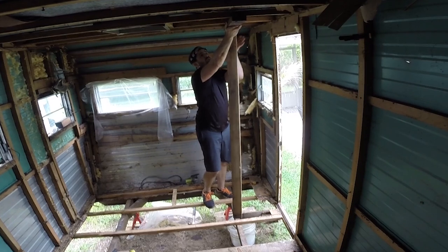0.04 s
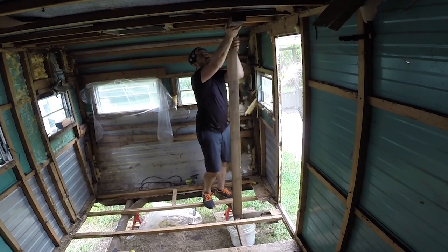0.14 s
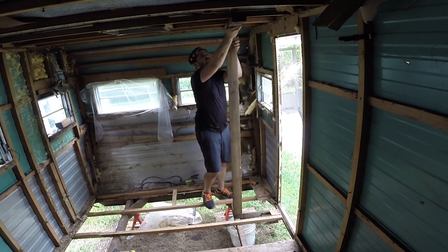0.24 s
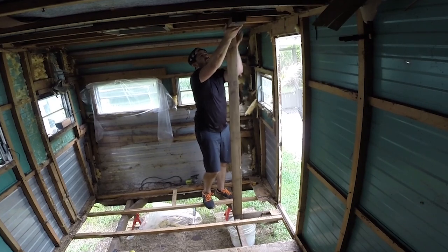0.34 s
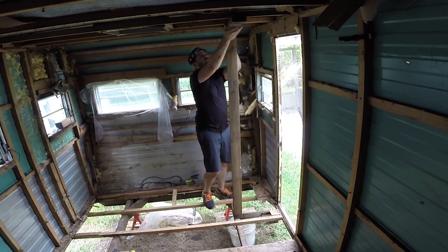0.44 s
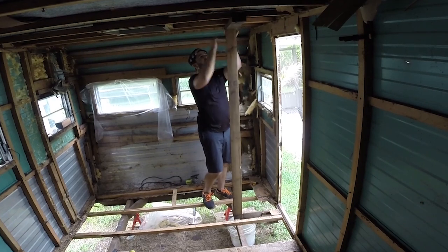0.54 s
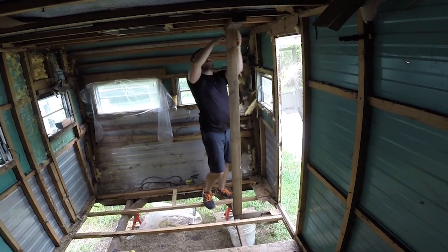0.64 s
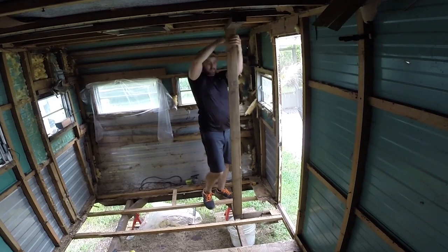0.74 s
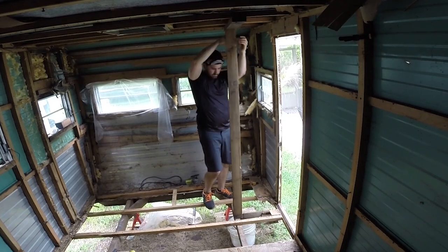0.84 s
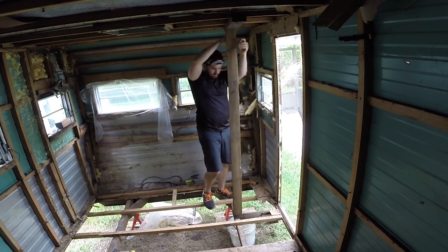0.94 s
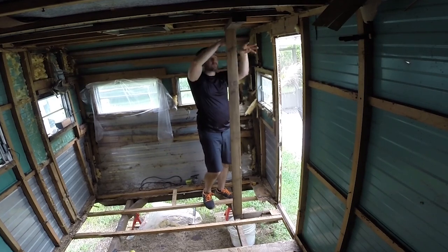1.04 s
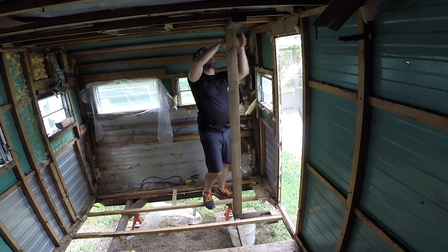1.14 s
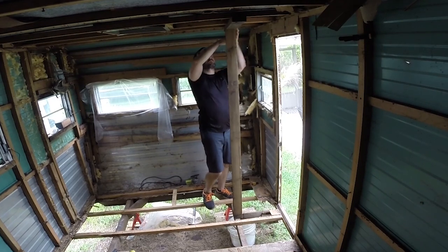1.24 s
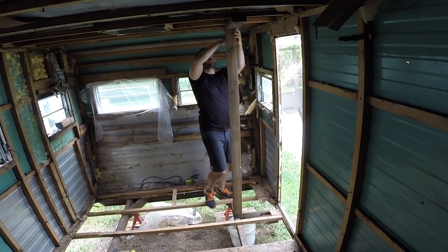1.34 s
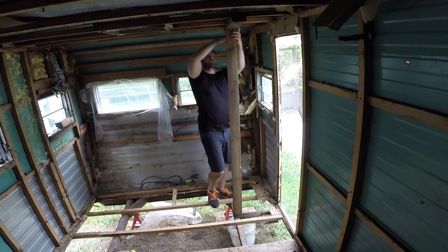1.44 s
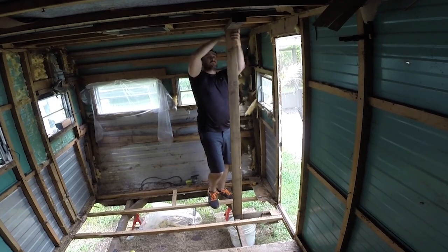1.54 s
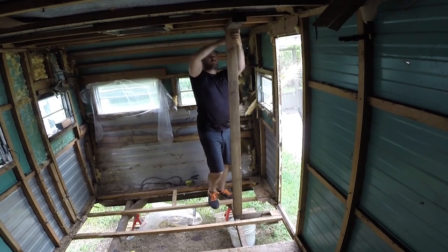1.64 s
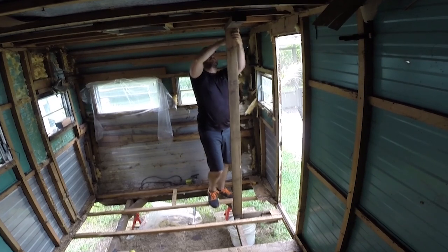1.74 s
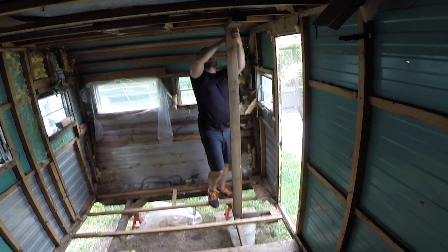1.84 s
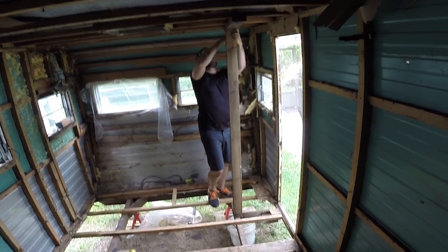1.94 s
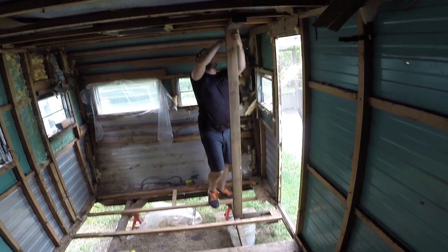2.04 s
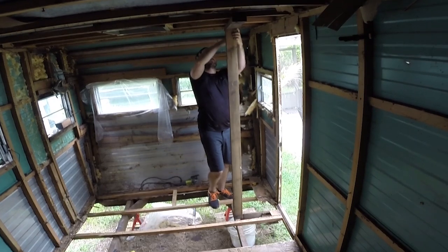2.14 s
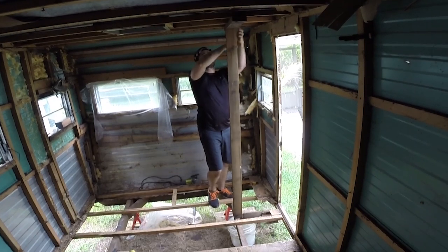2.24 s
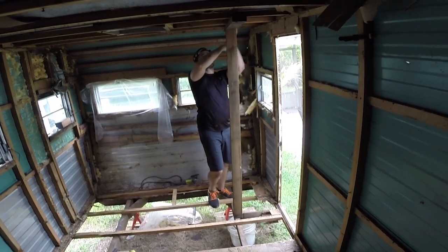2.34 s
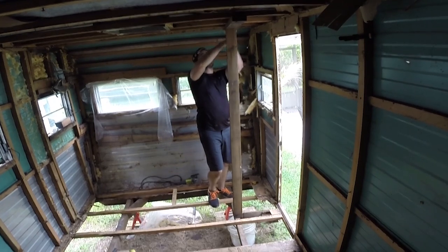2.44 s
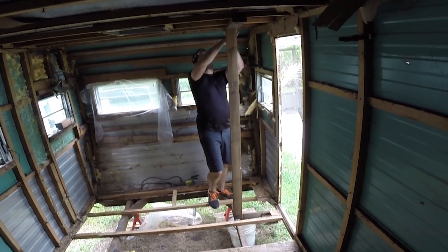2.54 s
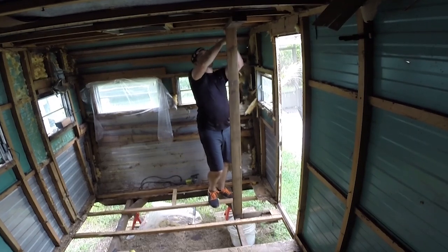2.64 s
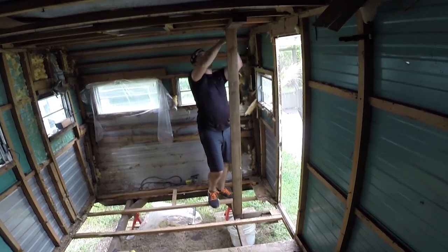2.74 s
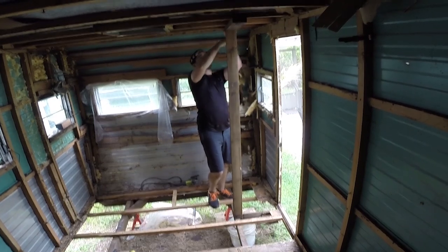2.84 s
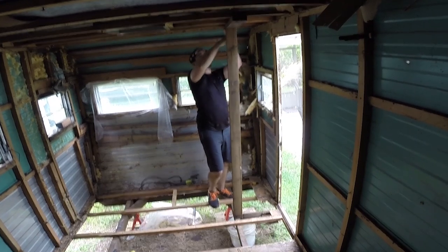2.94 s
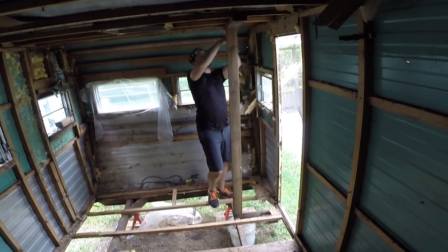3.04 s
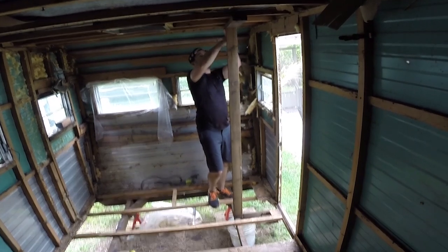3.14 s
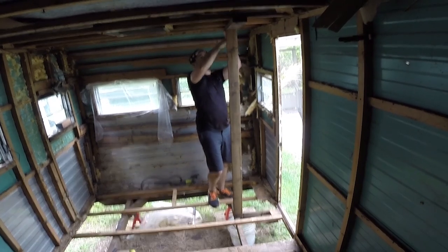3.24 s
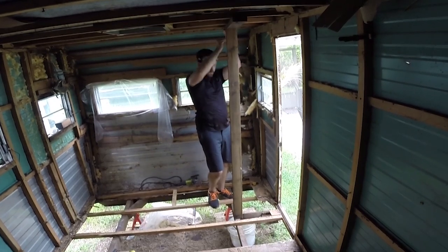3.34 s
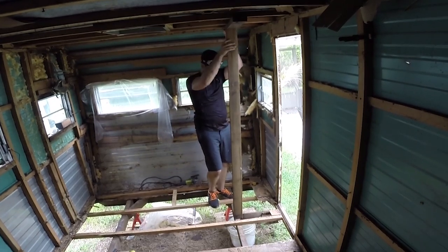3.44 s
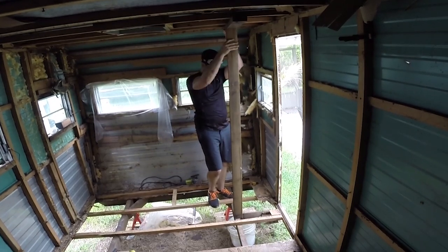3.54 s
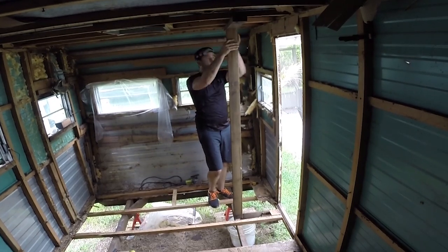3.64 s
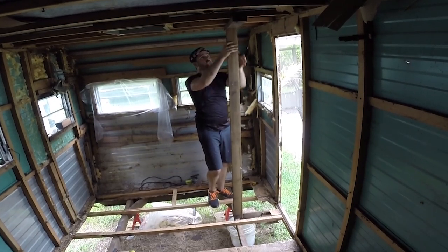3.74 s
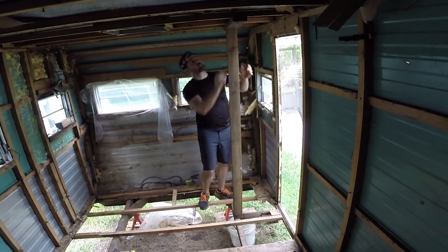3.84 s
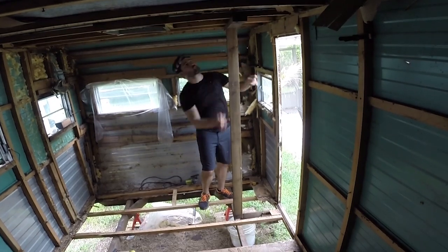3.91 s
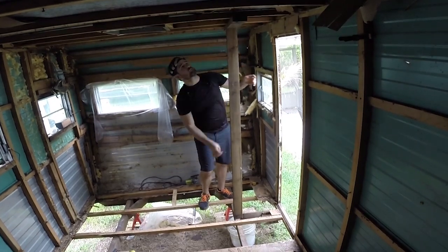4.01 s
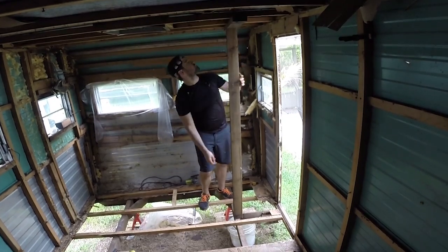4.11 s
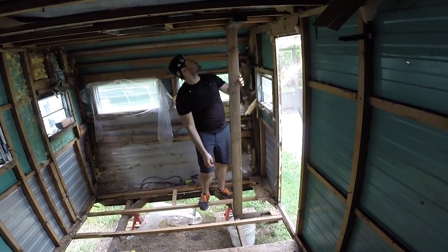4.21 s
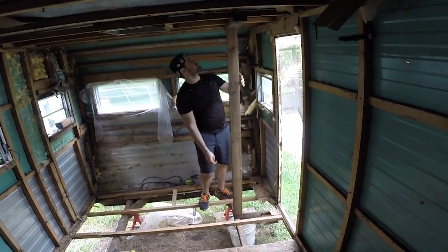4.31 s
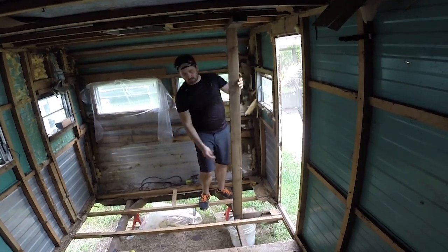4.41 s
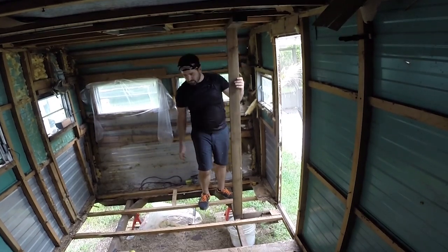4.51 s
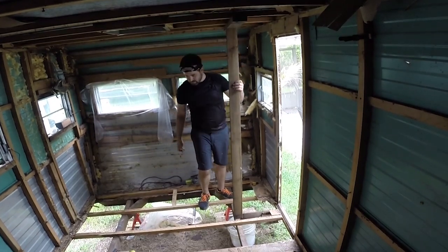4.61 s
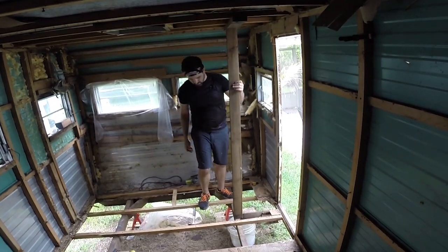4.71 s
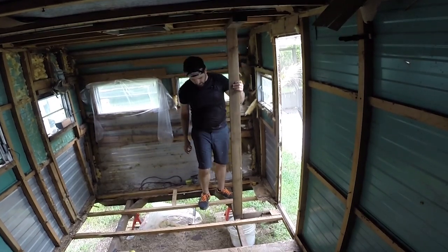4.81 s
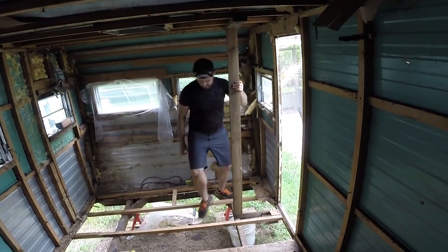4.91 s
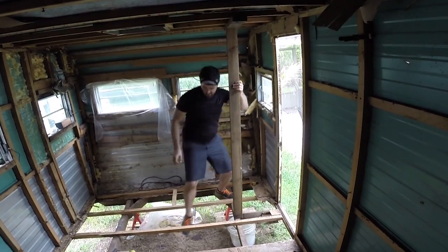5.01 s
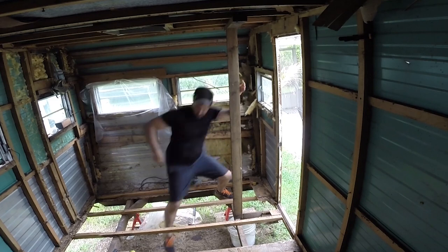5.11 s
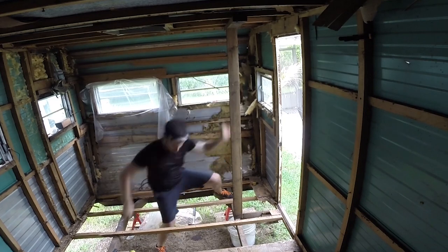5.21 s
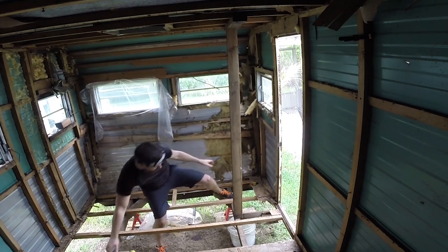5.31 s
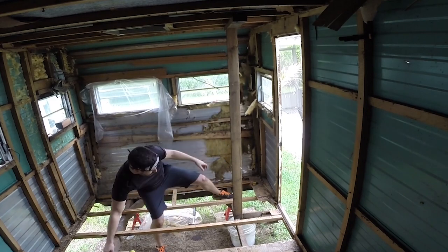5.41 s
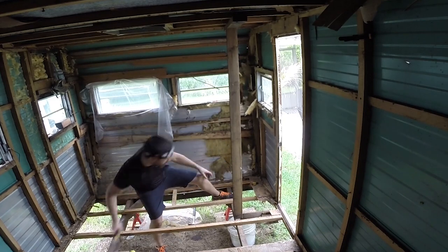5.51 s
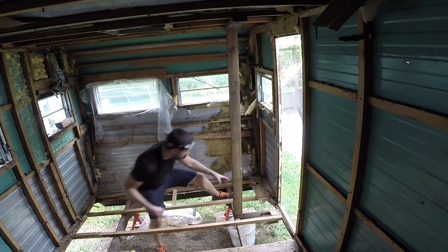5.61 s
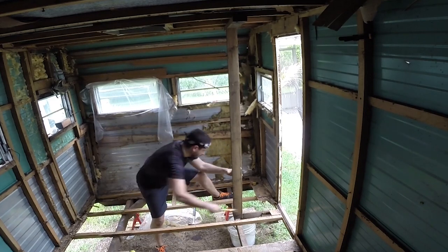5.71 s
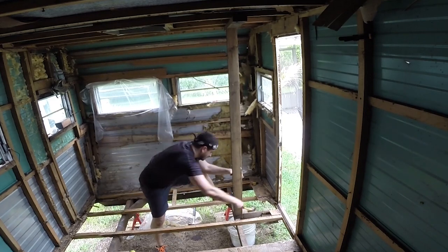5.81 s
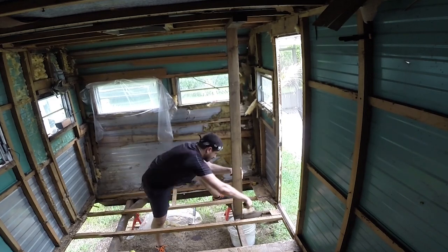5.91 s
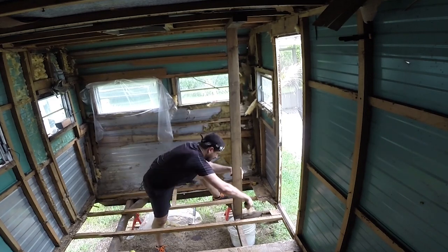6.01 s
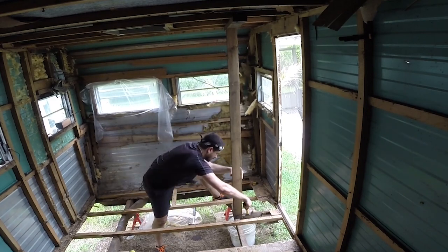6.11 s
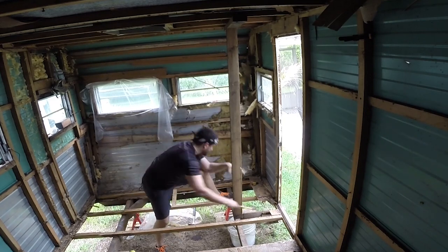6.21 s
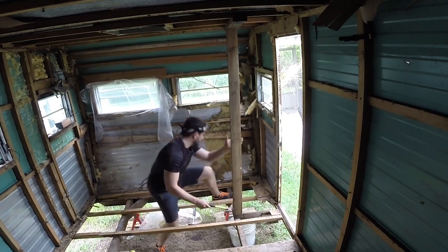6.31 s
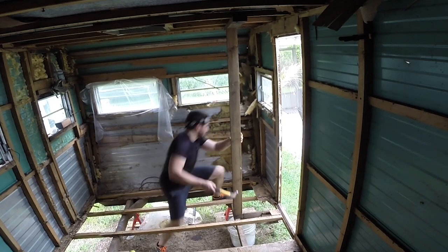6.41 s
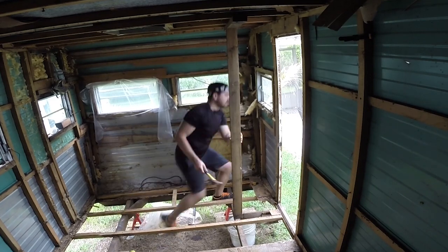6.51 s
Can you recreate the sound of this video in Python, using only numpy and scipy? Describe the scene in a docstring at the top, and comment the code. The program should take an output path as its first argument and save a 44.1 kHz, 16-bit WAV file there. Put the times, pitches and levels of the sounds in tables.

```python
"""Blows on a small metal cabin

Quick blows land on the timber frame: a lone clack among the first, a long run overhead, then three hard
knocks on a floor beam. Each is a noise crack with a rebound, ringing wood and a boom dying band by band.
The shell answers with a low rumble; shaped noise makes the scuffs of shoes and cloth, squeaks and bumps.
Two motors, built from sine waves, hum steadily over broad air noise."""
import sys
import numpy as np
from scipy import signal
from scipy.io import wavfile

SR = 44100
rng = np.random.default_rng(int(sys.argv[2]) if len(sys.argv) > 2 else 0)


def level_to_linear(level):
    """Convert decibel levels to linear amplitude factors, elementwise."""
    exponent = np.asarray(level, float) / 20
    return 10 ** exponent


def unload_wav(signal):
    """Save mono or channel-first audio to the path in sys.argv[1] as 16-bit WAV at rate SR, clipped to [-1, 1]."""
    wavfile.write(
        sys.argv[1],
        SR,
        np.round(np.clip(np.atleast_2d(signal).T, -1, 1) * 32767).astype(np.int16),
    )


N = 289296   # samples in the scene

# The levels in the next four tables are relative; struck() adds its own settings to them.
# blows overhead: t/s, crack strength/dB, boom strength/dB
ROOF_BLOWS = [(0.0014, -31.5, -23.5), (0.1796, -40, -29), (1.4895, -59, -36.5), (1.5757, -47.5, -33.5),
              (1.651, -32.5, -27), (1.72, -30, -23.5), (1.7865, -26, -29), (1.854, -19, -20),
              (1.9259, -22.5, -16), (1.9931, -21.5, -17), (2.0687, -18, -16), (2.1415, -21.5, -18),
              (2.2174, -20, -17.5), (2.2925, -24, -17), (2.3668, -24, -29.5), (2.4606, -20.5, -21),
              (2.5325, -19.5, -20), (2.613, -23.5, -21.5), (2.6892, -14.5, -15.5), (2.7654, -19, -16.5),
              (2.838, -18.5, -15), (2.9119, -20, -15.5), (2.9832, -17.5, -17.5), (3.055, -16, -18),
              (3.1336, -16, -15.5), (3.2223, -20, -17), (3.3027, -13.5, -16.5), (3.3799, -27.5, -17.5),
              (3.424, -31.5, -23.5)]
# knocks on the floor beam: t/s, crack strength/dB, boom strength/dB
FLOOR_KNOCKS = [(6.0365, 4, -19), (6.1267, 0.5, -18), (6.2117, 0.5, -17.5)]
# a lone clack of wood: t/s, crack strength/dB, boom strength/dB
LONE_CLACK = [(0.0837, -17, -26)]
# notes at which the struck wood rings: f/Hz, level/dB, time to fall 60 dB/s (0.45 s at most is used)
BEAM_NOTES = [(189, -19, .4), (242.6, -24, 0.35), (300, -31, 0.43), (374, -14, 0.51), (397, -20, 0.24),
              (619, -27, .12), (940, -28, 0.067), (1290, -19, 0.11), (1510, -24, 0.14), (1760, -20, 0.043),
              (1930, -14, 0.038), (2480, -26, 0.024), (3140, -21, 0.019), (3180, -21, 0.045),
              (3810, -19, .035), (4070, -10.5, 0.045), (5900, -28, 0.028), (7140, -19, 0.023),
              (8600, -26, 0.069)]


def rms_one(x):
    """Scales a sound to an average (rms) strength of 1."""
    return x / np.sqrt(np.mean(x ** 2) + 1e-20)


def at_hz(points, hz):
    """Reads a curve of (Hz, value) points at any pitch, on a logarithmic pitch scale."""
    points = np.array(points)
    return np.interp(np.log(hz), np.log(points[:, 0]), points[:, 1])


def band_pass(x, low_hz, high_hz):
    """Keeps the sound between two pitches."""
    return signal.sosfilt(signal.butter(2, [low_hz, high_hz], "band", fs=SR, output="sos"), x)


def drift(rate_hz):
    """Slow random wandering with spread 1: smoothed noise, made at every 40th sample and joined up."""
    r = np.exp(-2 * np.pi * rate_hz * 40 / SR)
    slow = signal.lfilter([1], [1, -2 * r, r * r], rng.standard_normal(N // 40 + 2002))
    slow = slow[2000:]   # skip the filter's start
    return np.interp(np.arange(N) / 40, np.arange(len(slow)), rms_one(slow))


def noise_bands():
    """Third-octave bands of white noise, neighbours unrelated: (centre Hz, sound)."""
    white = rng.standard_normal((2, N + SR))
    borders_hz = 25 * 2 ** np.arange(0, 9.4, 1 / 3)
    for k, (low, high) in enumerate(zip(borders_hz, borders_hz[1:])):
        yield np.sqrt(low * high), band_pass(white[k % 2], low, high)[SR:]


def swell(t, middle_s, length_s):
    """A smooth bump of height 1; length_s spans the part above 37 % of its height."""
    return np.exp(-((t - middle_s) / (length_s / 2)) ** 2)


def fade(x, t60):
    """A unit click becomes an envelope of height 1 that falls 60 dB in t60 seconds."""
    return signal.lfilter([1], [1, -level_to_linear(-60 / (t60 * SR))], x + 1e-18)


def ring(clicks, hz, t60):
    """A unit click sets off a sine of height about 1 that falls 60 dB in t60 seconds."""
    r, w = level_to_linear(-60 / (t60 * SR)), 2 * np.pi * hz / SR
    return signal.lfilter([0, np.sin(w)], [1, -2 * r * np.cos(w), r * r], clicks + 1e-18)


def motors():
    """Sines at multiples of each turning rate share one turning angle and waver slightly."""
    HUM_HZ, SECOND_HUM_HZ = 146.55, 108.6   # turning rates of the two motors
    # turning rate f/Hz, then a list of: multiple of that rate, rms level/dB before it wavers
    motor_tones = [(HUM_HZ, [(1, -50), (2, -55), (3, -57), (4, -63.5), (5, -65), (6, -54), (7, -68),
                   (9, -59), (13, -72.5), (15, -68.5), (18, -72), (21, -67.5), (23, -74), (24, -69),
                   (35, -73.5), (39, -77.5), (43, -79), (50, -76.5), (55, -77), (67, -80.5), (93, -84),
                   (107, -82)]), (SECOND_HUM_HZ, [(1, -56), (3, -58), (6, -61.5), (7, -73.5)])]
    out = np.zeros(N)
    for hz, multiples in motor_tones:
        turn = 2 * np.pi * hz * np.arange(N) / SR + 0.032 * drift(3.2)   # angle in radians
        for k, db in multiples:
            level = np.sqrt(2) * level_to_linear(db + 3.33 * drift(24))   # sqrt(2) turns rms into peak
            out += level * np.sin(k * turn + 0.31 * drift(2.9))
    return out


def air():
    """Broad steady noise: bands follow a fixed colour, each slightly patchy."""
    # colour of the air noise: f/Hz, relative level per Hz/dB
    air_colour = [(15, -48), (25, -13), (137, -2), (229, -10.5), (326, -11.5), (363, -10.5), (427, -4.5),
                  (476, -16.5), (641, -4.5), (796, -17), (863, -19), (936, -14), (1330, -19), (1480, -21),
                  (16000, -45)]
    total = np.zeros(N)
    for hz, band in noise_bands():
        total += level_to_linear(at_hz(air_colour, hz) + 0.6 * drift(1.6)) * band[:N]
    return level_to_linear(-43.5) * rms_one(total)


def struck(events, modes, tail, wood_db, modes_db, tail_db, crack_db, rebound_db, slap_db, ring_db,
           slower, sameness):
    """Blows on one body: crack and rebound, slaps off walls, ringing wood, an echo tail dying band by band."""
    # slaps returning from nearby walls: delay/s, f/Hz, relative level/dB
    wall_slaps = [(.0045, 793, 5), (.0095, 588, -1), (0.02, 450, 0)]
    # how fast the tail dies: f/Hz, time to fall 60 dB/s (before "slower" stretches it)
    dying_times = [(100, 0.74), (250, 0.48), (500, 0.45), (1100, 0.18), (2900, 0.1), (7700, 0.081),
                   (15000, 0.12)]
    s, crack_peak_db, boom_db = np.transpose(events)
    # the wood's strength lies between crack and boom
    wood_peak_db = wood_db + 0.59 * crack_peak_db + 0.41 * boom_db
    rows = np.transpose([boom_db, wood_peak_db, crack_peak_db])   # strength low, middle, high
    loudest = rows.max(axis=0)
    log_hz = np.log([350, 1400, 5000])   # where those three strengths hold
    at = (s * SR).round().astype(int)
    chance = rng.random((len(at), 3))
    rebound = ((0.006 + 0.016 * chance[:, 0]) * SR).astype(int)   # 6 to 22 ms later
    rebound_gain = level_to_linear(rebound_db - 7.5 * chance[:, 1])
    fresh_start = (chance[:, 2] * (N - SR)).astype(int)

    def strength(hz, spread_db):
        """Strength of every blow at one pitch, with some chance."""
        db = [np.interp(np.log(hz), log_hz, row) for row in rows]
        return level_to_linear(db + spread_db * rng.standard_normal(len(at)))

    def clicks(hz, spread_db, late_s=0):
        """One click per blow and a weaker one for its rebound."""
        train, start = np.zeros(N), at + int(late_s * SR)
        train[start] = strength(hz, spread_db)
        train[start + rebound] = train[start] * rebound_gain
        return train

    out, t = np.zeros(N + SR), np.arange(SR // 2) / SR
    size = len(t)
    for hz, band in noise_bands():
        t60 = slower * at_hz(dying_times, hz)
        power = 10 ** (-60 * t / t60 / 10)
        # a faint slower ring of the sheet metal follows
        power += 10 ** ((ring_db - 22.5 * t / t60) / 10)
        # echoes take a moment to gather, lows longer
        gather_s = min(t60 / 4, 0.001 + 34.0 / hz)
        power -= 0.74 * 10 ** (-30 * t / gather_s / 10)
        # the tail's colour holds for the loudest strengths
        shape = at_hz(tail, hz) - np.interp(np.log(hz), log_hz, loudest)
        envelope = level_to_linear(shape + tail_db) * np.sqrt(np.maximum(power, 0))
        gains = strength(hz, spread_db=2.0)
        for i, gain, fresh, lag, lag_gain in zip(at, gains, fresh_start, rebound, rebound_gain):
            # blows on the same spot partly repeat the same pattern of echoes
            echoes = sameness * band[:size] + np.sqrt(1 - sameness ** 2) * band[fresh:fresh + size]
            one = gain * envelope * echoes
            out[i:i + size] += one
            out[i + lag:i + lag + size] += lag_gain * one
    out = out[:N]
    for hz, db, t60 in modes:
        hits = clicks(hz, spread_db=4.0, late_s=2.572 / hz)   # low notes start later
        out += level_to_linear(db + modes_db) * ring(hits, hz, min(t60, 0.45))
    for late_s, hz, db in wall_slaps:
        hits = clicks(hz, spread_db=0.5 + sameness, late_s=late_s)
        out += level_to_linear(db + slap_db) * ring(hits, hz, 4.8 / hz)
    # the hard tick of first contact
    out += level_to_linear(crack_db + 7.0) * ring(clicks(5000, spread_db=1.5), 3730, 0.002)
    crack = fade(clicks(4200, spread_db=4.0), 0.014) * rng.standard_normal(N)
    return out + level_to_linear(crack_db) * band_pass(crack, 1800, 11000)


def roof_blows():
    """Blows overhead: long low ringing, and echoes that are partly alike from blow to blow."""
    # notes that ring overhead: f/Hz, relative level/dB, time to fall 60 dB/s (0.45 s at most is used)
    roof_notes = [(198.3, -4, 0.61), (219.2, -0.5, 0.51), (264.5, -1.5, 0.56), (298.9, -1, 0.47),
                  (376.9, 1.5, 0.2), (421.2, -7.5, 0.51), (487.5, -9, 0.6), (567.4, -0.5, 0.24),
                  (780, -7, 0.13), (940, -1.5, 0.052), (1948, -1, 0.09), (3040, -6.5, 0.037),
                  (3500, -5.5, 0.066), (4130, -8, 0.055), (5120, -22, 0.027)]
    # colour of the echo tail: f/Hz, relative level per Hz/dB
    roof_echo = [(53, -29), (90, -15.5), (119, -11), (214, -5.5), (457, -10), (544, -8), (1790, -21.5),
                 (1950, -23), (2830, -29.5), (4080, -20), (5410, -30.5), (7660, -28), (16000, -47)]
    return struck(ROOF_BLOWS, roof_notes, roof_echo, wood_db=-9.0, modes_db=-11.5, tail_db=5.5,
                  crack_db=-12, rebound_db=-10.0, slap_db=-7, ring_db=-13.5, slower=1.0, sameness=0.54)


def shudder():
    """Low lumpy rumble of walls and roof: every blow feeds it energy, which swells and dies."""
    s, _, boom_db = np.transpose(ROOF_BLOWS + LONE_CLACK + FLOOR_KNOCKS)
    # level for a boom of -21 dB, before the swell smooths it; other booms move it by 0.37 of their difference
    level_db = -32.5 + 0.37 * (boom_db + 21)
    level_db -= 10 * (s >= FLOOR_KNOCKS[0][0])   # the floor beam shakes the shell less
    rise_s, t60_s = 0.021, 1.17
    energy = np.zeros(N)
    energy[(s * SR).astype(int)] = level_to_linear(2 * level_db)
    r = np.exp(-1 / (rise_s * SR))
    # fade() works on energy here, so half the time makes the level fall 60 dB in t60_s
    level = np.sqrt(signal.lfilter([1 - r], [1, -r], fade(energy, t60_s / 2)))
    low = band_pass(rng.standard_normal(N + SR), 38, 105)[SR:]
    return level * rms_one(low)


def clack():
    """A lone clack of wood: the beam's notes, kept faint, with a short tail."""
    # colour of the echo tail: f/Hz, relative level per Hz/dB
    clack_echo = [(53, -32.5), (90, -8.5), (360, -0.5), (457, -12), (839, -6), (1140, -5), (1290, -9),
                  (1410, -12), (2100, -5), (3510, -10), (16000, -32)]
    return struck(LONE_CLACK, BEAM_NOTES, clack_echo, wood_db=3.0, modes_db=-21, tail_db=0.5,
                  crack_db=-9, rebound_db=-10.5, slap_db=-4, ring_db=-20.5, slower=0.55, sameness=0)


def scuffs():
    """Shoes and cloth: soft rubs of noise above 600 Hz that swell and fade with a fast random grain."""
    # rubs: middle t/s, length/s, level at 4 kHz before the grain/dB, brightness/dB per octave
    rubs = [(0.194, .03, -56, -1), (.245, 0.055, -48, -6), (1.465, 0.023, -50, -5.5), (3.9, .025, -51, 1),
            (3.938, 0.047, -44.5, -3.5), (5.0, .06, -47.5, -3), (5.276, 0.2, -53.5, -0.5),
            (5.406, 0.011, -48, -5), (5.445, 0.023, -46, -4.5), (5.536, 0.012, -51.5, 9.5),
            (5.542, 0.084, -45.5, -2.5), (6.37, .03, -55, -2.5), (6.51, 0.13, -58, 0)]
    t, out = np.arange(N) / SR, np.zeros(N)
    grain = level_to_linear(2.1 * drift(150))
    for hz, band in noise_bands():
        level = np.zeros(N)
        for s, length, db, bright_db in rubs:
            near = slice(int((s - 2 * length) * SR), int((s + 2 * length) * SR))
            colour = level_to_linear(db + bright_db * np.log2(hz / 4000)) * (hz > 600)
            level[near] += colour * swell(t[near], s, length)
        out += level * band[:N]
    return out * grain


def squeaks():
    """Brief pitched rubs and bumps: noise through a narrow resonance."""
    # squeaks and bumps: middle t/s, length/s, f/Hz, width/Hz, rms level at the top of the swell/dB
    pitched_rubs = [(3.938, 0.041, 3450, 200, -50.5), (5.0, 0.045, 420, 200, -46),
                    (5.452, 0.025, 350, 160, -31.5), (5.531, 0.046, 433, 200, -37),
                    (5.556, 0.036, 560, 250, -41), (5.557, 0.035, 1280, 150, -44)]
    t, out = np.arange(N) / SR, np.zeros(N)
    for s, length, hz, width_hz, db in pitched_rubs:
        tone = band_pass(rng.standard_normal(N), hz - width_hz / 2, hz + width_hz / 2)
        out += level_to_linear(db) * rms_one(tone) * swell(t, s, length)
    return out


def floor_knocks():
    """Hard knocks on the floor beam: strong cracks and slaps, very alike, with no deep bass."""
    # colour of the echo tail: f/Hz, relative level per Hz/dB
    beam_echo = [(53, -43), (90, -17), (249, 1.5), (330, -7), (393, -5.5), (1510, -3), (1790, -3),
                 (1950, -9), (2320, -6.5), (3830, -9.5), (5650, -30), (7170, -17.5), (16000, -43)]
    beam = struck(FLOOR_KNOCKS, BEAM_NOTES, beam_echo, wood_db=-8.0, modes_db=-4.5, tail_db=4.5,
                  crack_db=-12.5, rebound_db=-27, slap_db=13, ring_db=-22.5, slower=0.83, sameness=0.82)
    return signal.sosfilt(signal.butter(4, 89.5, "high", fs=SR, output="sos"), beam)


def scene():
    """All the sounds added together, as one channel."""
    steady = motors() + air()
    blows = roof_blows() + shudder() + clack() + floor_knocks()
    return (steady + blows + scuffs() + squeaks())[None]


def roll_off(x):
    """The treble ends steeply here."""
    return signal.sosfilt(signal.butter(12, 16400, fs=SR, output="sos"), x)


def record(dry):
    """The top is cut by 60 dB from 16.8 kHz up, and peaks stop at full scale."""
    cut = signal.sosfilt(signal.cheby2(12, 60, 16800, fs=SR, output="sos"), dry)
    mix = np.clip(cut, -1, 1)
    return roll_off(mix)


dry = scene()
out = record(dry)
unload_wav(out)
```